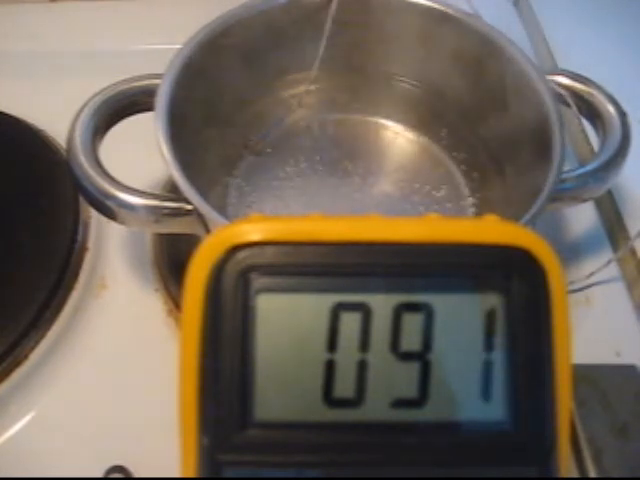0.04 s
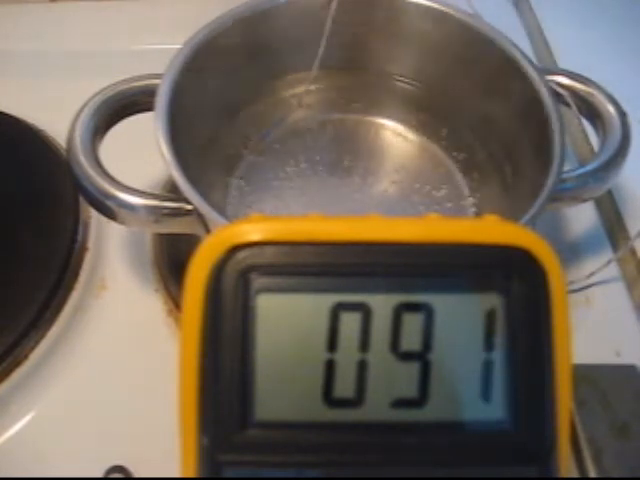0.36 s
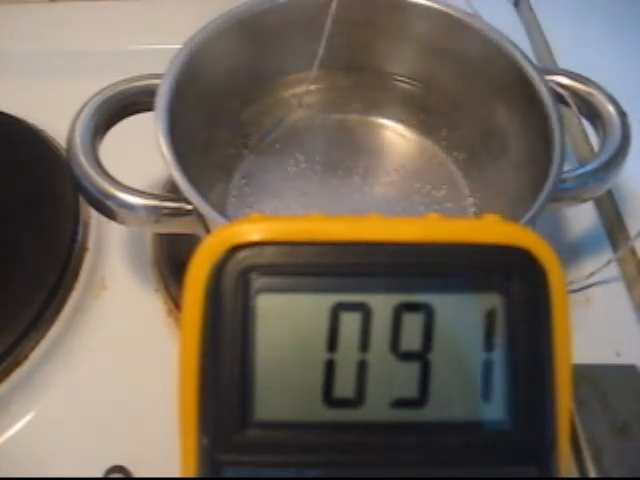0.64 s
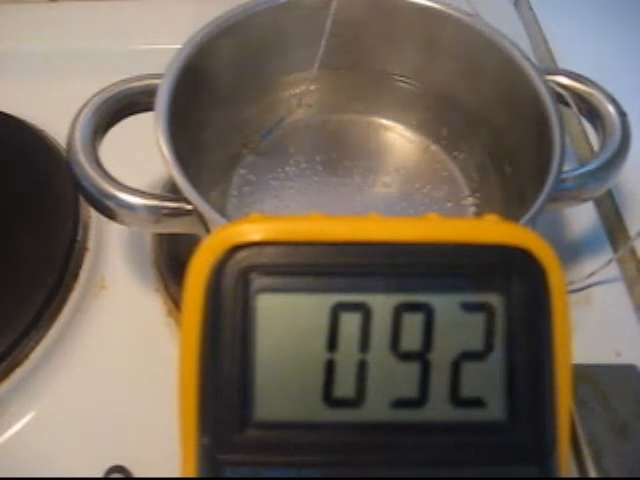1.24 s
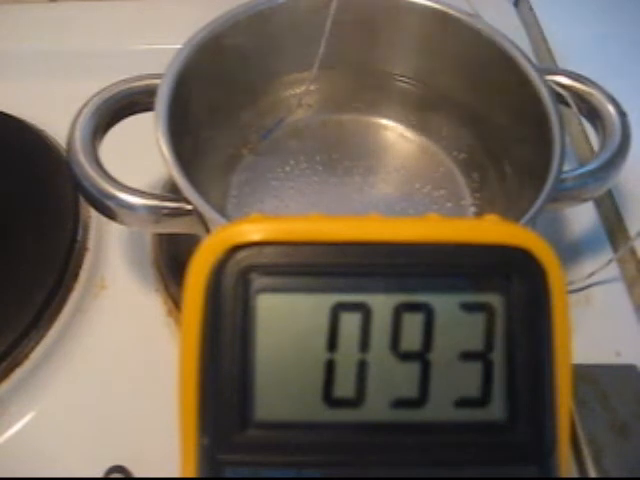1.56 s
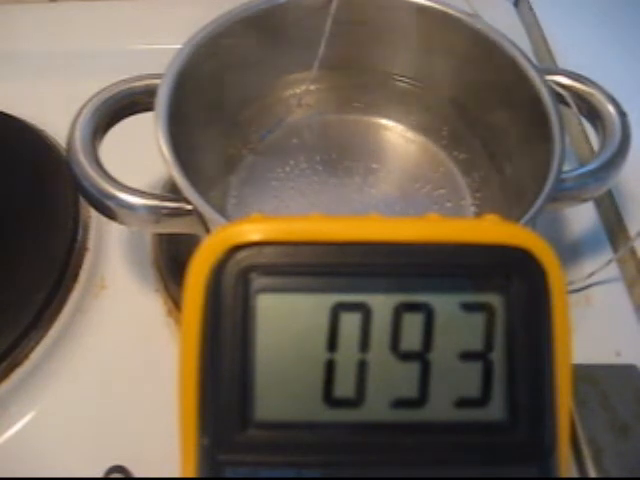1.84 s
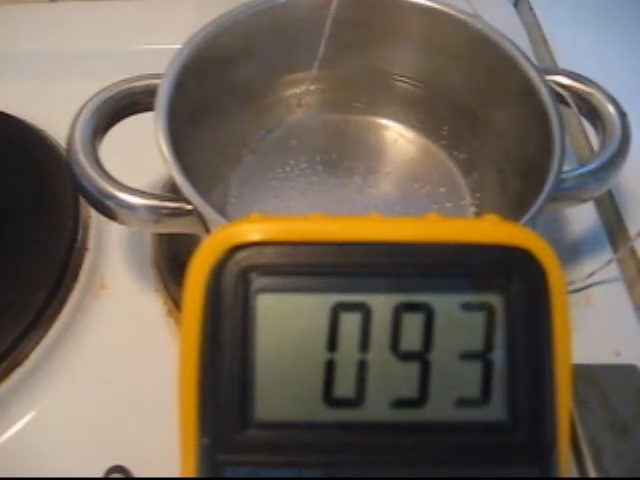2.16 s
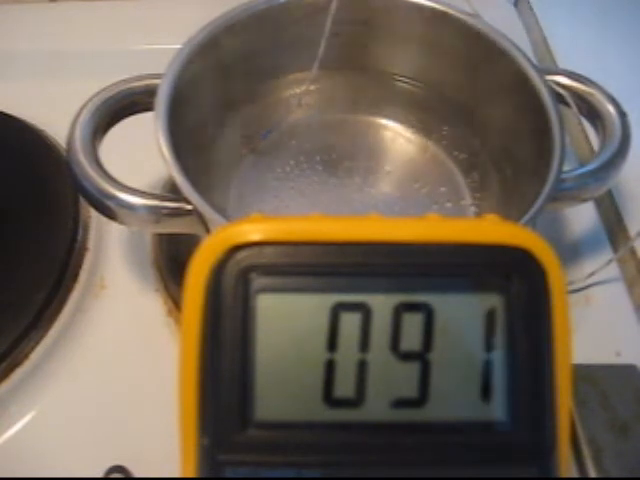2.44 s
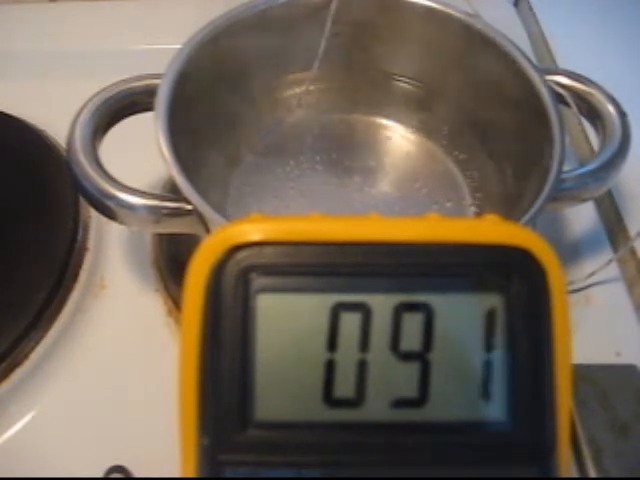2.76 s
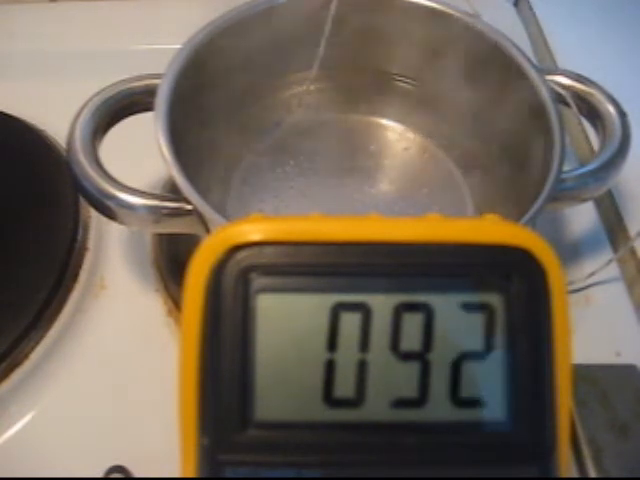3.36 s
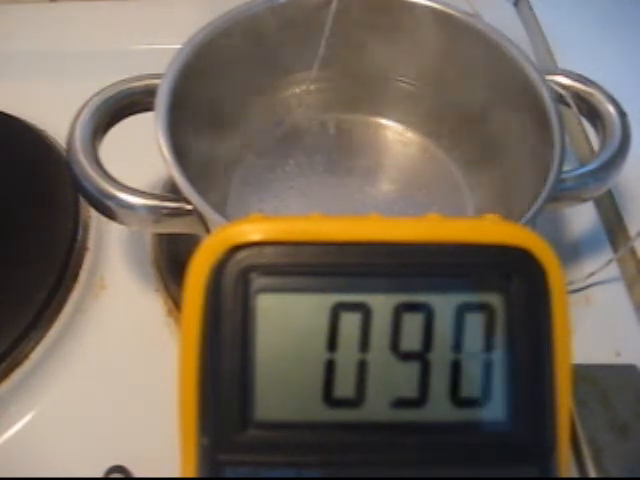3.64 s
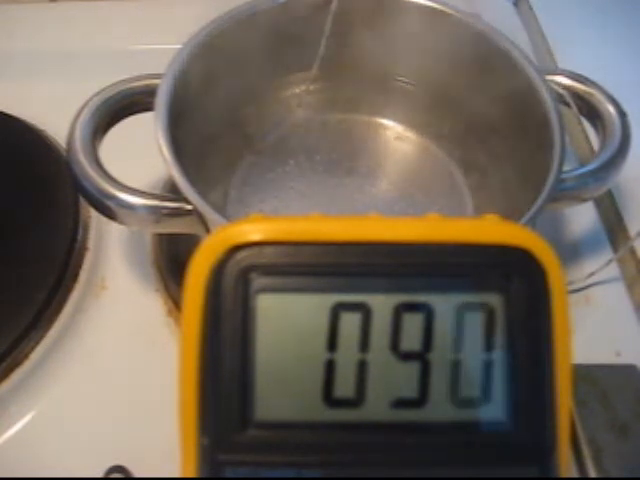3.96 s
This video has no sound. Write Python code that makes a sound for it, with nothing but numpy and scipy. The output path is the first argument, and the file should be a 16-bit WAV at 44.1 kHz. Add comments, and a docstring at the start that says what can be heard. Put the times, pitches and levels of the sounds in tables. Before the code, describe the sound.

Water rumbles in a steel pot just short of boiling, a dense, hollow patter of tiny bubbles that holds steady for all four seconds. Bigger bubbles add dull bumps in the first 0.6 seconds, around 1.9 and 2.3 seconds, and again from 3.7 to 3.9 seconds. The sound is close, with a thin glassy edge and a faint hiss, hum and whine underneath.

```python
"""On an electric hob, a steel pot of water rumbles just short of the boil.
Steam bubbles collapse on its hot base by the thousand, a dense patter with a few big, dull bumps,
all sounding through the water and the pot's resonances. A small camera close by adds hiss,
a faint hum and whine, and a glassy sheen from its slow, stepped sampling."""
import sys
import numpy as np
from scipy import signal
from scipy.fft import rfft, irfft
from scipy.io import wavfile

SR = 44100
rng = np.random.default_rng(int(sys.argv[2]) if len(sys.argv) > 2 else 0)


def to_wav(sig):
    """Store sig (one row per channel, or 1-D mono) as 16-bit WAV at the path in sys.argv[1].

    Samples outside -1..1 are clipped; the rate is SR.
    """
    pcm = np.clip(np.atleast_2d(sig), -1, 1) * 32767
    pcm = np.round(pcm).astype(np.int16)
    wavfile.write(sys.argv[1], SR, pcm.T)  # frames by channels


N = 176400


def small_collapses():
    """Tiny steam bubbles implode: a dense patter of uneven clicks that swells with the simmer."""
    # vigour of the simmer: (time [s], relative level [dB])
    simmer = [(0, 2.5), (.07, -1.5), (.33, -0.5), (.435, -1.5), (.5, -0.4), (.65, -0.5), (.77, -0.5),
              (1.45, -1), (1.53, 1.5), (1.6, -1), (1.74, 1.5), (1.83, -3), (1.95, 1), (2.01, -2),
              (2.15, -0.7), (2.72, -1), (3.05, 0), (3.3, -1), (3.59, 1.5), (3.66, -3), (3.79, -0.8),
              (3.85, 0.5), (3.93, -1), (4.0, 0.5)]
    bubbles_per_s, size_spread_db = 3000, 2
    times, levels_db = np.transpose(simmer)
    vigour = from_db(np.interp(np.arange(N) / SR, times, levels_db))
    collapses = rng.random(N) < bubbles_per_s / SR
    sizes = from_db(size_spread_db * np.minimum(rng.exponential(1, N), 3))
    polarity = rng.choice([-1, 1], N)
    return from_db(-21) * rms_one(collapses * sizes * polarity * vigour)


def large_collapses():
    """A big bubble collapses more slowly, so each one lands as a duller click."""
    # single big bubbles: (time [s], relative level [dB])
    bumps = [(.083, 6.5), (.119, 7), (.405, 10.5), (.441, 9.5), (.596, 8), (.646, -1), (.691, 2), (.766, 1),
             (1.483, 1), (1.911, 3.5), (1.955, 2), (2.312, 8), (3.569, -1), (3.699, 6), (3.726, 4.5),
             (3.873, 7.5), (3.923, 6.5)]
    clicks = np.zeros(N)
    for time, level_db in bumps:
        clicks[int(time * SR)] += from_db(level_db)
    soften = signal.butter(2, 1220, fs=SR, output="sos")
    return signal.sosfilt(soften, clicks + 1e-18)


def pot_response(hz):
    """The body of the rumble: the water's broad colour, lifted wherever the pot rings."""
    # colour of a collapse heard through the water: (frequency [Hz], relative level [dB])
    water = [(45, -38), (100, -20.5), (170, -15), (305, -15), (350, -23.5), (402, -32), (450, -16),
             (555, -14), (610, -6.5), (700, -1.5), (790, 0), (855, -7.5), (1050, -12), (1300, -22),
             (1620, -23.5), (1820, -27.5), (2250, -35.5), (3000, -42.5), (5000, -50.5)]
    # resonances of the pot and its water: (frequency [Hz], width [Hz], lift [dB])
    pot_modes = [(192, 8.1, 1.5), (264, 18, 2.5), (505, 41.8, 16.5), (628.2, 29, 4.5), (887, 26, 1),
                 (954.4, 55, 9), (1123, 50, 7), (1217, 66, 6.5), (1371, 104, 4.5), (1529, 53, 3.5),
                 (1705, 53, 11), (1960, 45, 2), (2167, 41, 8.5), (2330, 28, 9.5)]
    body_db = colour_db(water, hz)
    for centre, width, lift_db in pot_modes:
        body_db += lift_db * 2 ** -(2 * (hz - centre) / width) ** 2
    rms_gain = np.sqrt(np.mean(from_db(body_db) ** 2))
    return minimum_phase(body_db) / rms_gain


def camera_noise(hz, hiss_db=-45):
    """The camera's steady bed of hiss, with a faint hum and whine that waver slightly."""
    # colour of the hiss: (frequency [Hz], relative level [dB])
    hiss = [(20, -6), (60, 7), (400, -7.5), (2000, 5), (2950, -2.5), (3750, 2.5), (4600, -1.5), (5400, -1)]
    # the hum and the whine: (frequency [Hz], width [Hz], level [dB])
    tones = [(27.5, 2.5, -56), (3465, 6, -64)]
    in_band = hz < SR / 8  # below half the camera's sampling rate
    spectrum = rfft(rng.standard_normal(N)) * from_db(colour_db(hiss, hz)) * in_band
    bed = from_db(hiss_db) * rms_one(irfft(spectrum, N))
    for centre, width, level_db in tones:
        phase = 2 * np.pi * centre * np.arange(N) / SR
        wander = np.cumsum(rng.standard_normal(N)) * np.sqrt(np.pi * width / SR)
        bed += from_db(level_db) * np.sqrt(2) * np.sin(phase + wander)
    return bed


def from_db(db):
    """Decibels to gain."""
    return 10 ** (np.asarray(db) / 20)


def rms_one(x):
    """Scale to unit rms."""
    return x / np.sqrt(np.mean(x ** 2) + 1e-20)


def colour_db(points, hz):
    """An EQ curve joined by straight lines on a log-frequency axis."""
    frequencies, levels_db = np.transpose(points)
    return np.interp(np.log(hz + 1), np.log(frequencies), levels_db)


def minimum_phase(db):
    """Turn an EQ curve into a response that rings only after the hit."""
    cepstrum = irfft(np.log(from_db(db)))
    half = len(cepstrum) // 2
    cepstrum[1:half] *= 2
    cepstrum[half + 1:] = 0
    return np.exp(rfft(cepstrum))


def scene():
    """Every collapse rings through the same pot, over the camera's noise, in mono."""
    hz = np.arange(N // 2 + 1) * SR / N
    collapses = small_collapses() + large_collapses()
    rumble = irfft(rfft(collapses) * pot_response(hz), N)
    return (rumble + camera_noise(hz))[None]


def record(dry):
    """The camera's stepped sampling mirrors the rumble into a glassy treble; the very top is cut."""
    hold_samples, roll_off_hz, cutoff_hz = 4, 11650, 12705
    stepped = np.repeat(dry[:, ::hold_samples], hold_samples, axis=1)[:, :N]
    roll_off = signal.butter(12, roll_off_hz, fs=SR, output="sos")
    brick_wall = signal.ellip(10, .1, 90, cutoff_hz, fs=SR, output="sos")
    return signal.sosfilt(brick_wall, signal.sosfilt(roll_off, stepped))


dry = scene()
out = record(dry)
to_wav(out)
```